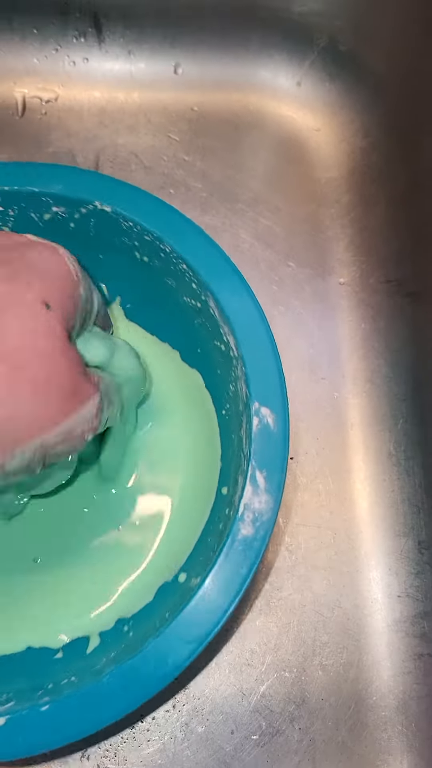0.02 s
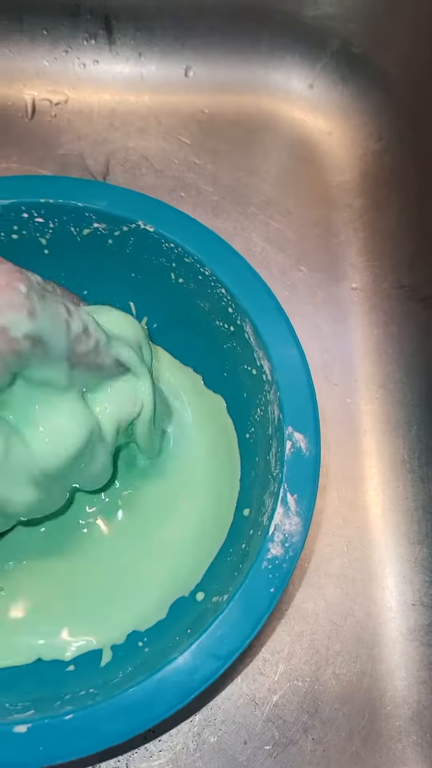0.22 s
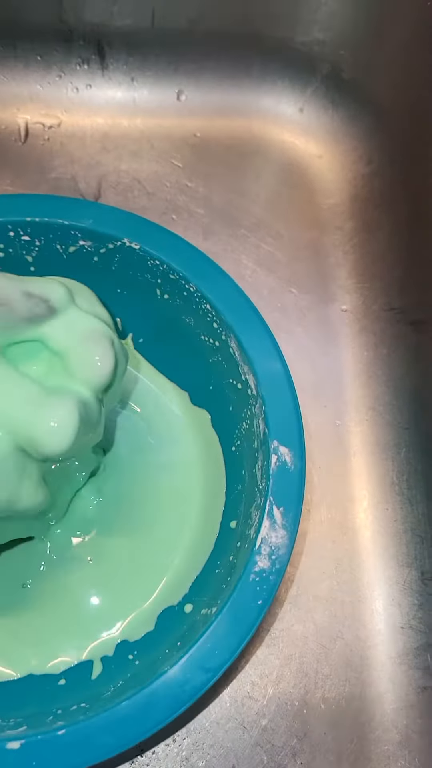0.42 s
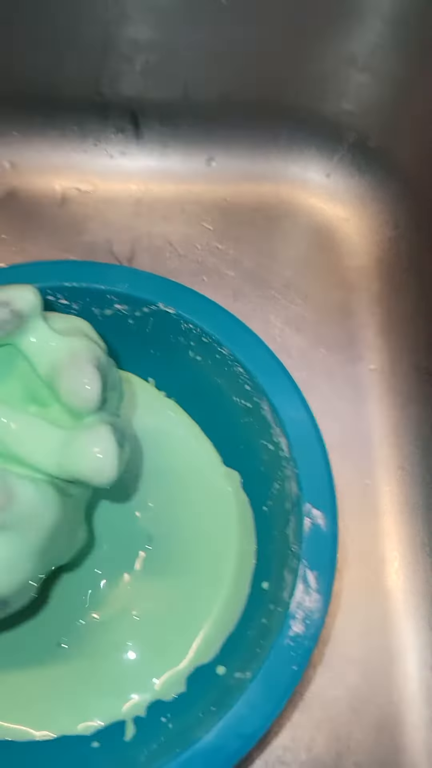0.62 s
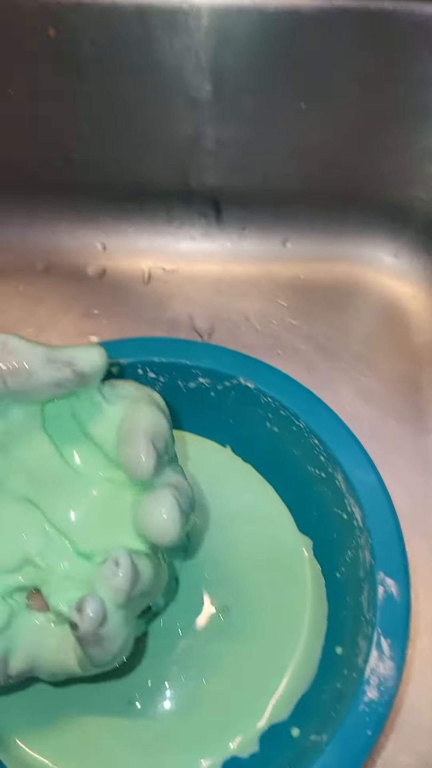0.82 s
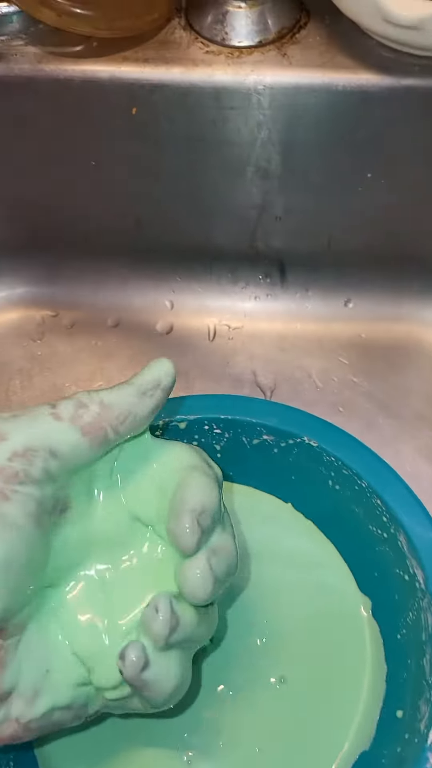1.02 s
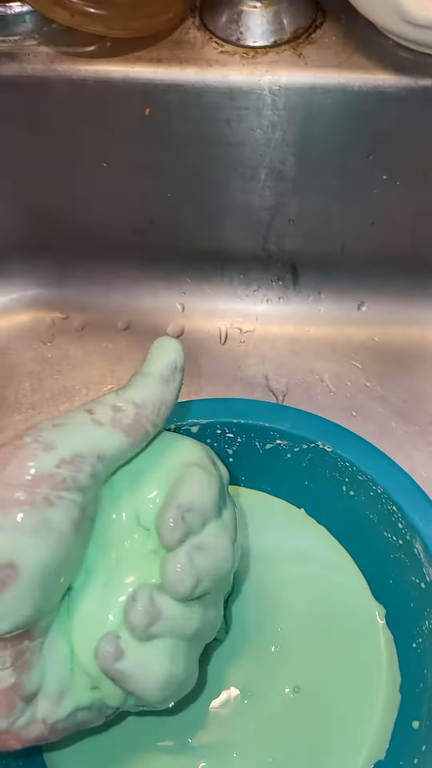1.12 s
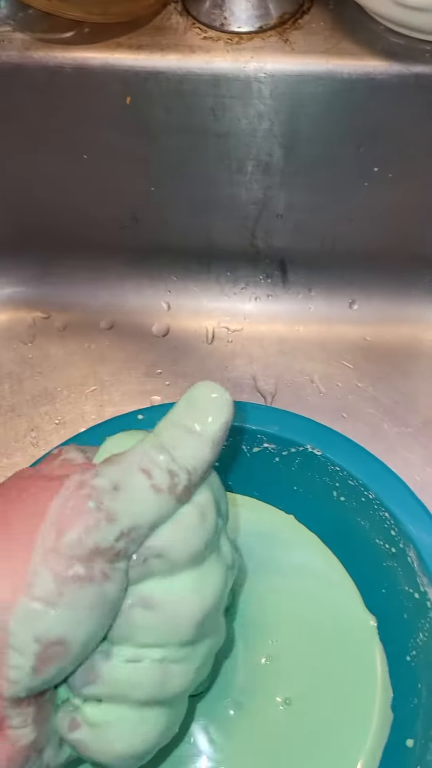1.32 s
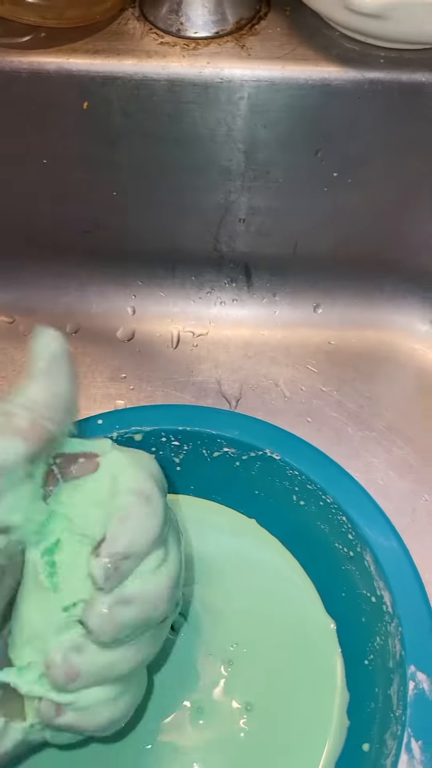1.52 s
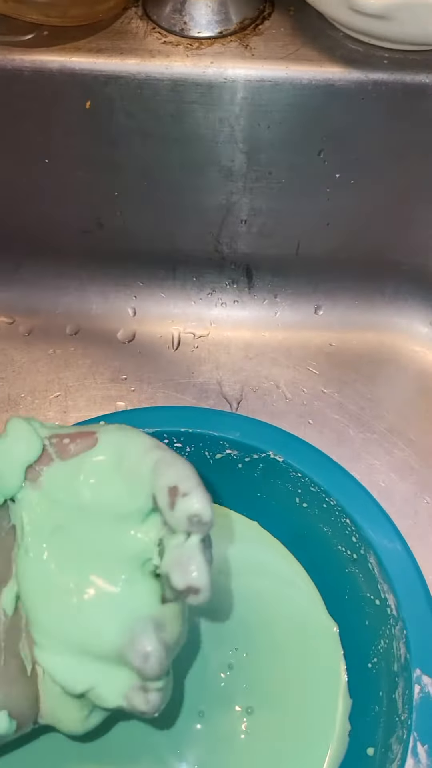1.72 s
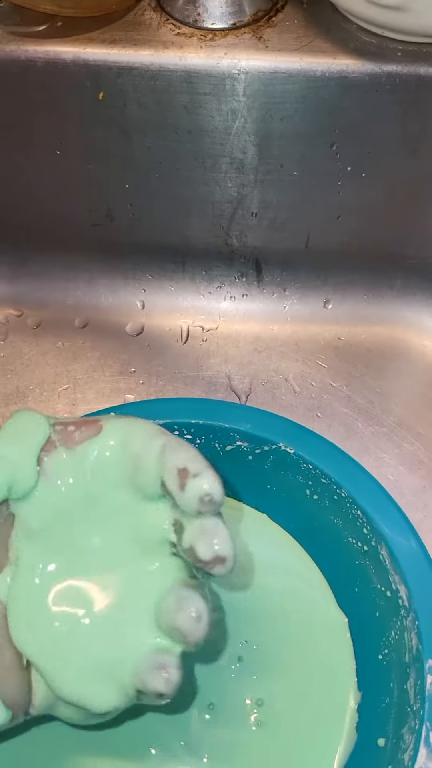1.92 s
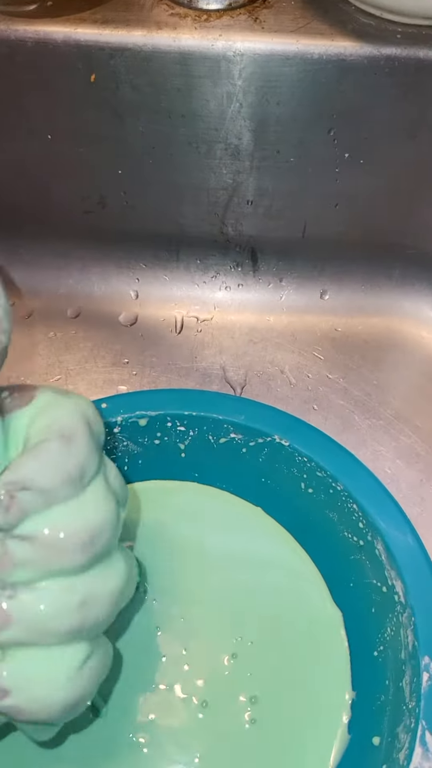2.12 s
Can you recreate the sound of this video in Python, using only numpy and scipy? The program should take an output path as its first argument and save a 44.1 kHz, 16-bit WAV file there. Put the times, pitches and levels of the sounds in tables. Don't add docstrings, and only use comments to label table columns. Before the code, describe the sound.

Close stereo pickup in a quiet kitchen: a short burst of bowl knocks booms through a metal basin with plopping air pockets, then near-silence, then small clusters of crisp sticky ticks from a hand kneading paste.

```python
import sys
import numpy as np
from scipy import signal
from scipy.fft import rfft, irfft
from scipy.io import wavfile
from scipy.ndimage import uniform_filter1d

SR = 44100
rng = np.random.default_rng(int(sys.argv[2]) if len(sys.argv) > 2 else 0)


def boost(x):
    u = np.asarray(x, float) / 20
    return 10 ** u


def bounce(signal):
    frames = np.transpose(np.atleast_2d(signal))
    limited = np.clip(frames, -1, 1)
    pcm = np.round(limited * 32767).astype(np.int16)
    wavfile.write(sys.argv[1], SR, pcm)


N = 97020
SIDES = np.array([[1], [-1]])

# (f/Hz, level/dB)
RUMBLE_COLOUR = [(30, -20.5), (55, 6), (90, -4.5), (120, -5), (183, 1), (240, -4), (320, -12.5),
                 (480, -10.5)]
# (t/s, level/dB)
RUMBLE_LEVEL = [(0, -50), (.7, -55.5), (1.1, -59), (1.5, -54.5), (2.2, -51.5)]
# (f/Hz, level/dB)
HISS_COLOUR = [(320, -34), (550, -4.5), (1330, -22), (2800, -27), (4480, -25.5), (7940, -27.5),
               (10600, -43), (15100, -20), (16700, -36)]
# (f/Hz, left minus right/dB)
HISS_PAN = [(700, 4), (3000, -7), (8000, -3), (15000, -10.5)]
# (f/Hz, width/Hz, level/dB)
WHINES = [(2603, 210, -80.5), (5240, 660, -78.5), (7690, 160, -90.5), (15200, 340, -80.5)]
# (f/Hz, width/Hz, level/dB)
DRONES = [(180.66, 16, -72.5), (454, 8.3, -75.5)]

# (t/s, peak level/dB, brightness/dB, left minus right/dB)
SNAPS = [(.597, -56, -3, -21.5), (0.6929, -51, 14, 2), (0.721, -43, 4, -1.5), (0.723, -44.5, -2, -22),
         (1.2224, -53.5, 4, -8.5), (1.3688, -29, -7, 1), (1.4631, -43.5, 6, -0.5), (1.486, -43, 2, 13.5),
         (1.4902, -41.5, 1.5, -5), (1.521, -28.5, -1.5, -1.5), (1.5447, -32.5, -3, -0.5),
         (1.552, -28.5, 13, 8.5), (1.5541, -27.5, 2, -11), (1.5567, -23, -4, -1), (1.561, -28, -3, 9),
         (1.572, -35.5, -17, 10), (1.5846, -49, -7, -3.5), (1.6186, -35, 4.5, 2),
         (1.6908, -44.5, -9.5, 3.5), (1.6961, -37, 16.5, -0.5), (1.703, -33.5, 4, 3),
         (1.7542, -51.5, 7.5, 8), (1.7633, -53, 8, -1), (1.9612, -63.5, 15.5, 0), (2.0721, -55.5, -4.5, 7),
         (2.0837, -51.5, 3, 4), (2.0986, -46, -6, -6), (2.1332, -45, -4, 6.5), (2.1509, -45, -11, 4.5),
         (2.167, -23.5, -30, 4), (2.1672, -28, -12, -3.5), (2.176, -38, -20, 0.5)]
# (f/Hz, level/dB)
SNAP_COLOUR = [(800, -25), (2000, -22.5), (4000, -7.5), (6500, -5.5), (8500, -7.5), (10500, -9.5),
               (15000, 3.5), (16600, -11)]
# (f/Hz, left minus right/dB)
SNAP_PAN = [(700, 1.5), (1290, 7.5), (2380, -3.35), (4400, -4), (8120, -3), (11000, -8), (15000, -15.5)]
# (t/s, level of the fine crackle/dB)
GRIP = [(0, -67), (.05, -95), (.09, -115), (.13, -71), (.56, -75), (.6, -66.5), (.66, -74), (.72, -69.5),
        (.8, -83), (1.42, -73.5), (1.48, -61), (1.54, -51.5), (1.57, -43), (1.63, -62), (1.75, -70),
        (2.04, -77), (2.13, -64), (2.2, -90)]
# (delay/s, level/dB)
WALL_ECHOES = [(.0012, -9), (.0026, -11), (.0041, -12), (.0058, -17)]
# (start t/s, length/s, level/dB, centre f/Hz)
SLIDES = [
    (0.052, 0.069, -57, 4300),
    (0.795, 0.12, -58, 3690),
    (1.386, 0.2, -66.5, 1614),
]
# (t/s, level/dB, f/Hz, time to fall 60 dB/s)
POCKETS = [(.1925, -29.5, 890, .03), (.1935, -41, 2300, 0.011), (.2435, -10.5, 1292, .045),
           (.2445, -22, 709, .035), (.268, -16, 1110, 0.035), (.2715, -13.5, 613, 0.046),
           (.2945, -14, 1305, 0.035), (.298, -19.5, 569, .06), (.317, -23, 912, 0.046),
           (.319, -24.5, 1243, 0.024), (.322, -20, 557, 0.057), (.346, -32, 887, 0.055),
           (.347, -29, 1310, 0.029), (.363, -27, 920, 0.031), (.365, -24, 564, 0.015),
           (.3825, -32, 895, 0.071), (.384, -31.5, 1630, 0.028), (.41, -43.5, 890, 0.051),
           (.411, -39, 1300, 0.036), (.453, -53.5, 1333, 0.073)]

# (t/s, rim level/dB, crack level/dB, boom level/dB, rim tilt/dB per octave)
KNOCKS = [(.0205, -48, -62.5, -46, 0.1), (.062, -73, -77, -52, 0.1), (.192, -15, -43, -31, -4),
          (.198, -32, -55.5, -31.5, -4.5), (.208, -52, -69.5, -23, 0.1), (0.2417, -3, -12.5, -11, 3.2),
          (0.2465, -9.5, -24.5, -16, -0.45), (.2665, -11, -23.5, -11.5, 0.3), (.2695, -20, -22, -18, -0.2),
          (.288, -19, -32, -23.5, -3), (0.2929, -13.5, -20.5, -16.5, -4.5), (.297, -10.5, -26, -22.5, -1),
          (.318, -13.5, -43.5, -36, 1), (.3452, -20.5, -39.5, -44.5, 6), (.362, -16.5, -45.5, -26, -1),
          (.367, -26.5, -65, -47, 7), (.381, -18.5, -31, -27, 6), (.4087, -23, -43, -38.5, -3),
          (.4135, -30.5, -50, -37, 11)]
# (t/s, level/dB, f/Hz, time to fall 60 dB/s)
THUDS = [(0.0221, -27.5, 106, 0.079), (0.0651, -40, 86.5, .15), (0.198, -28.5, 105, 0.071),
         (0.2093, -16.5, 100.3, 0.4), (0.248, -4, 87, .12), (0.2693, -9, 148.8, .05),
         (0.2761, -3, 102.7, 0.18), (.2995, 0.5, 102.5, 0.06), (0.3247, -10, 77.5, 0.14),
         (0.388, -12.5, 85, 0.1), (0.4175, -26.5, 94.9, 0.17)]
SINK_HZ = [54, 64, 79, 101, 121, 179, 218, 254, 373]
# (level/dB, time to fall 60 dB/s)
SINK_RING = [(-22, 0.45), (-18, 0.69), (-6.5, 0.22), (-12, 0.13), (-7.5, 0.57), (-1, 0.13), (-5, 0.16),
             (-3.5, 0.15), (-11, 0.36)]
BOWL_HZ = [465, 520, 576, 620, 685, 905, 1050, 1190, 1297, 1385, 1450, 1650, 2220, 2720]
# (level/dB, time to fall 60 dB/s)
BOWL_RING = [(-4, 0.047), (-8.5, 0.076), (-2, 0.069), (-9.5, 0.07), (-22.5, .4), (-4, 0.078), (-10, 0.031),
             (-4.5, 0.014), (1.5, 0.039), (-2.5, .035), (-5.5, 0.052), (-8.5, 0.037), (-11, 0.031),
             (-8, .035)]
# (f/Hz, level/dB)
CRACK_COLOUR = [(450, 0), (1000, -3), (2200, -1.5), (3000, -3), (4200, -2.5), (6200, -2.5), (7500, -18.5),
                (9500, -30.5)]
# (f/Hz, left minus right/dB)
KNOCK_PAN = [(250, 0), (380, -2.5), (700, -.4), (1290, 6), (2380, .4), (4400, -3), (15000, -12)]
# (f/Hz, level/dB)
SPLASH_COLOUR = [(6000, -9.5), (8000, -3), (10500, -12), (13000, -4), (15200, 0.5), (16500, -11.5)]
# (f/Hz, level/dB)
ROOM_COLOUR = [(250, -4.5), (600, 6.5), (900, -0.5), (1500, -6.5), (3000, -13), (6000, -24.5)]


def on_log(points, hz):
    p = np.array(points, float)
    return np.interp(np.log(hz + 1), np.log(p[:, 0] + 1), p[:, 1])


def colour(x, spectrum, pan=((1, 0), (2, 0)), skirt_db=12):
    hz = np.arange(4097) * SR / 8192
    below = spectrum[0][0] / (hz + 1)
    above = hz / spectrum[-1][0]
    db = on_log(spectrum, hz) - skirt_db * np.log2(np.maximum(below, np.maximum(above, 1)))
    cepstrum = irfft(np.log(boost(db + SIDES * on_log(pan, hz) / 2)))
    cepstrum[:, 1:4096] *= 2
    cepstrum[:, 4097:] = 0
    h = irfft(np.exp(rfft(cepstrum)))
    h = h / np.sqrt(np.mean(np.sum(h ** 2, axis=1)))
    return signal.fftconvolve(x * np.ones((2, 1)), h, axes=1)[:, :N]


def band(x, hz, width_hz):
    b, a = signal.iirpeak(min(hz, .45 * SR), hz / width_hz, SR)
    return signal.lfilter(b, a, x) * np.sqrt(SR / np.pi / width_hz)


def strikes(times, db):
    x = np.zeros(N)
    np.add.at(x, np.clip((np.asarray(times) * SR).astype(int), 0, N - 1), boost(db))
    return x


def fade(x, tau_s):
    return signal.lfilter([1], [1, -np.exp(-1 / (tau_s * SR))], x)


def ring(x, modes, contact_s, shares):
    t = np.arange(SR // 2) / SR
    push = np.sin(np.pi * np.clip(t / contact_s, 0, 1)) ** 2
    h = 0
    for share, (f, db, t60) in zip(shares, modes):
        h = h + share * boost(db) * np.sin(2 * np.pi * f * t) * np.exp(-np.log(1000) * t / t60)
    pushed = signal.fftconvolve(x, push / push.sum())[:N]
    return signal.fftconvolve(pushed * np.ones_like(h[..., :1]), h, axes=-1)[..., :N]


def walk(rate):
    k = int(SR / rate)
    w = np.repeat(rng.standard_normal(N // k + 1), k)
    w = uniform_filter1d(uniform_filter1d(w, k), k)[:N]
    return (w - w.mean()) / w.std()


def lag(x, left_s, right_s):
    return np.array([np.roll(c, int(s * SR)) for c, s in zip(x, (left_s, right_s))])


def lean(hz, sign):
    half_db = on_log(KNOCK_PAN, hz) / 2
    return np.array([[boost(half_db)], [sign * boost(-half_db)]])


def kitchen():
    t = np.arange(N) / SR
    mid, side = rng.standard_normal((2, N))
    low_noise = mid + boost(-10) * SIDES * side
    rumble = colour(low_noise, RUMBLE_COLOUR + [(680, -21.5), (800, -38.0)], skirt_db=4)
    rumble = rumble * boost(np.interp(t, *np.array(RUMBLE_LEVEL).T) + 1.2 * walk(19))
    hiss = colour(rng.standard_normal((2, N)), HISS_COLOUR, HISS_PAN)
    hiss = hiss * boost(-71.5 - 0.84 + 0.27 * walk(0.68))
    drones = sum(boost(db) * band(low_noise, f, w) for f, w, db in DRONES)
    whines = sum(boost(db) * band(rng.standard_normal((2, N)), f, w) for f, w, db in WHINES)
    return rumble + drones + hiss + whines


def sliding_fingers():
    t = np.arange(N) / SR
    out = np.zeros((2, N))
    for start, length, db, hz in SLIDES:
        swell = np.sin(np.pi * np.clip((t - start) / length, 0, 1))
        rub = band(band(rng.standard_normal((2, N)), hz, hz * 1.3), hz, hz * 1.3) / 3
        out += boost(db) * swell * rub
    return out * boost(1.9 * walk(29.28))


def tick_in_basin(x, tick, tail):
    tick_s, basin_s, basin_db = .00035, .011, -19.5
    echoed = x + sum(boost(g) * lag(x, d, 0.45 * d) for d, g in WALL_ECHOES)
    short = fade(echoed, tick_s) * (np.sign(tick[0]) + 0.12 * SIDES * tick[1])
    return short + boost(basin_db) * np.sqrt(fade(x ** 2, basin_s / 2)) * tail


def snapping_films():
    crackle_per_s, bright_hz = 1040, 9630
    s, db, bright_db, pan_db = np.array(SNAPS).T
    dull = np.array([strikes(s, db - bright_db / 2 + side * pan_db / 2) for side in (1, -1)])
    bright = np.array([strikes(s, db + bright_db / 2 + side * pan_db / 2) for side in (1, -1)])
    grip_db = np.interp(np.arange(N) / SR, *np.array(GRIP).T)
    crackle = (rng.random(N) < crackle_per_s / SR) * boost(grip_db)
    tick, tail = rng.standard_normal((2, N)), rng.standard_normal((2, N))
    below = tick_in_basin(dull + crackle, tick, tail)
    above = tick_in_basin(bright + crackle, tick, tail)
    split = signal.butter(4, bright_hz, fs=SR, output="sos")
    both = signal.sosfilt(split, below) + above - signal.sosfilt(split, above)
    return lag(colour(both, SNAP_COLOUR, SNAP_PAN) * boost(-1.0), 0, 0.00016)


def air_pockets():
    glide_per_s, lead_rad = 1.5, .6
    out = np.zeros((2, N))
    t = np.arange(SR // 10) / SR
    for s, db, hz, t60 in POCKETS:
        phase = 2 * np.pi * hz * t * (1 + glide_per_s * t / 2)
        tone = np.sin(phase + SIDES * lead_rad) * np.minimum(hz * t, 1) * boost(db - 60 * t / t60)
        start = int(s * SR)
        out[:, start:start + len(t)] += tone * boost(SIDES * on_log(KNOCK_PAN, hz) / 2)
    return out


def room_answer():
    t60_s, build_s, level_db = .28, 0.0027, -24.5
    s, rim_db = np.array(KNOCKS).T[:2]
    power = fade(fade(strikes(s, rim_db) ** 2, t60_s / np.log(1e6)), build_s)
    wash = boost(level_db) * np.sqrt(power / (0.0034 * SR))
    return colour(wash * rng.standard_normal((2, N)), ROOM_COLOUR)


def sink_thuds():
    both_sides = [-np.ones((2, 1))]
    thud = sum(ring(strikes([s], [db]), [(f, 0, t60)], .002, both_sides) for s, db, f, t60 in THUDS)
    return signal.lfilter(*signal.butter(1, 60, "high", fs=SR), thud)


def basin_boom():
    s, boom_db = np.array(KNOCKS).T[[0, 3]]
    modes = [(f, *m) for f, m in zip(SINK_HZ, SINK_RING)]
    shares = [(-1) ** k * lean(f, 0.87) for k, f in enumerate(SINK_HZ)]
    return ring(strikes(s, boom_db), modes, 0.0031, shares)


def contact_crack():
    crack_s, tail_s, tail_db, tail_hz = .003, 0.013, -20, 3500
    splash_s, splash_db, splash_slope = 0.0054, -11.5, 1.7
    s, crack_db = np.array(KNOCKS).T[[0, 2]]
    hardest = crack_db.max()
    hits = strikes(s, crack_db)
    mid, side = rng.standard_normal((2, N))
    noise = mid + .6 * SIDES * side
    tail = boost(tail_db + 5.8 * walk(250)) * fade(hits, tail_s)
    rough = signal.lfilter(*signal.butter(1, tail_hz, fs=SR), 2 * tail * noise)
    crack = colour(fade(hits, crack_s) * noise + rough, CRACK_COLOUR, KNOCK_PAN)
    splash = fade(strikes(s, splash_db + splash_slope * (crack_db - hardest) + hardest), splash_s)
    splash = colour(splash * rng.standard_normal((2, N)), SPLASH_COLOUR, KNOCK_PAN)
    return lag(crack + splash, .00005, 0)


def bowl_rim():
    tap_s, softening_s = .00028, .000018
    spot_db, spot_detune = 2.5, .006
    shares = [-lean(f, (-1) ** k if f < SR / 25 else 1) for k, f in enumerate(BOWL_HZ)]
    hardest = max(knock[2] for knock in KNOCKS)
    out = np.zeros((2, N))
    for s, rim_db, crack_db, _, tilt_db in KNOCKS:
        if rim_db <= -55:
            continue
        modes = []
        for f, (db, t60) in zip(BOWL_HZ, BOWL_RING):
            u, v = rng.standard_normal(2)
            level = db + spot_db * v + tilt_db * np.log2(f / 1000)
            modes.append((f * (1 + spot_detune * u), level, t60))
        contact_s = tap_s + softening_s * (hardest - crack_db)
        out += ring(strikes([s], [rim_db]), modes, contact_s, shares)
    return boost(-11) * out


def knocking_bowl():
    return bowl_rim() + contact_crack() + basin_boom() + sink_thuds() + room_answer()


def scene():
    return kitchen() + sliding_fingers() + snapping_films() + air_pockets() + knocking_bowl()


def band_limit(x):
    return signal.sosfilt(signal.butter(12, 16820, fs=SR, output="sos"), x)


def record(dry):
    x = signal.sosfilt(signal.butter(3, 48, "high", fs=SR, output="sos"), dry)
    x = np.tanh(0.58 * x) / 0.6
    x = signal.sosfilt(signal.ellip(6, .2, 30, 15950, fs=SR, output="sos"), x)
    return band_limit(x)


dry = scene()
out = record(dry)
bounce(out)
```